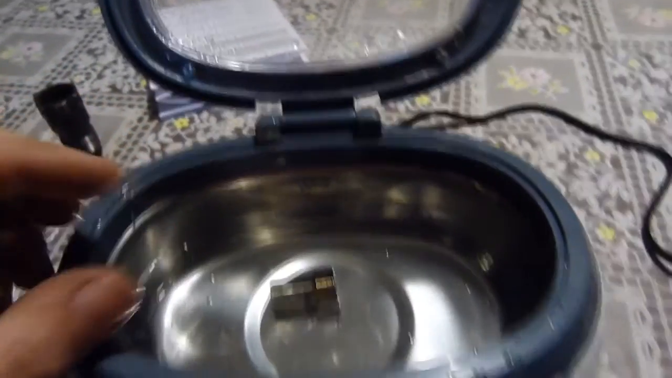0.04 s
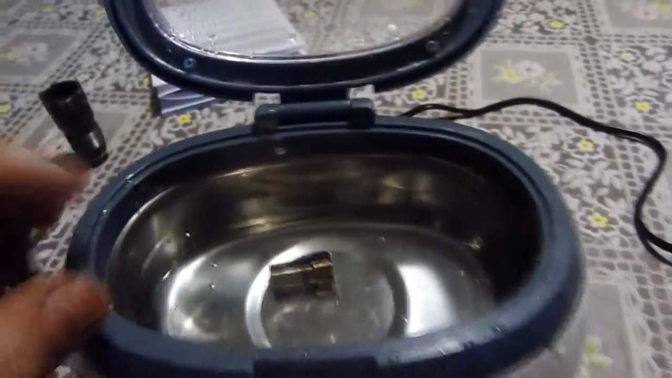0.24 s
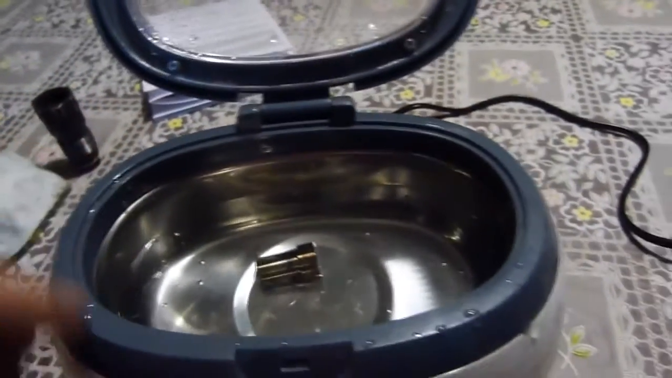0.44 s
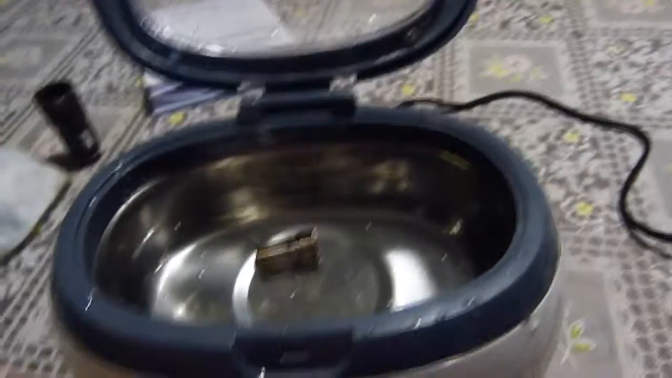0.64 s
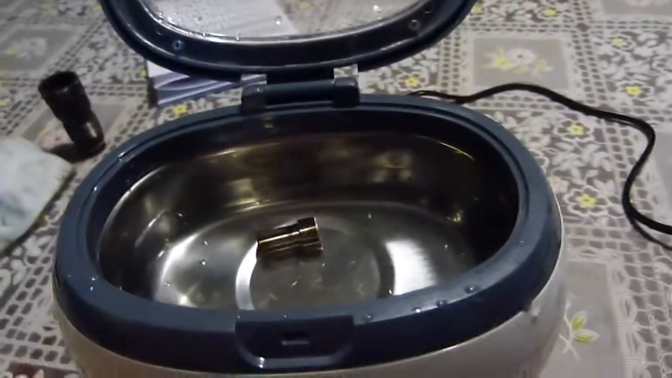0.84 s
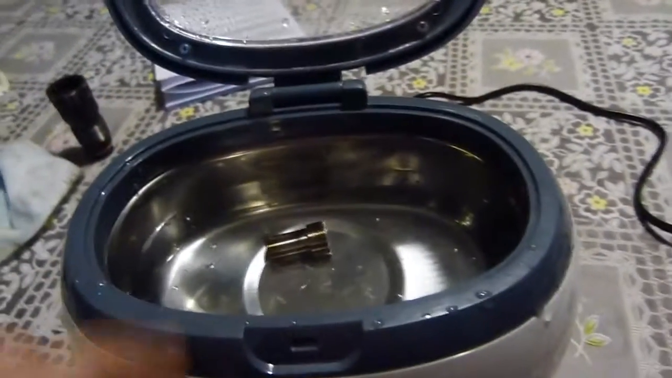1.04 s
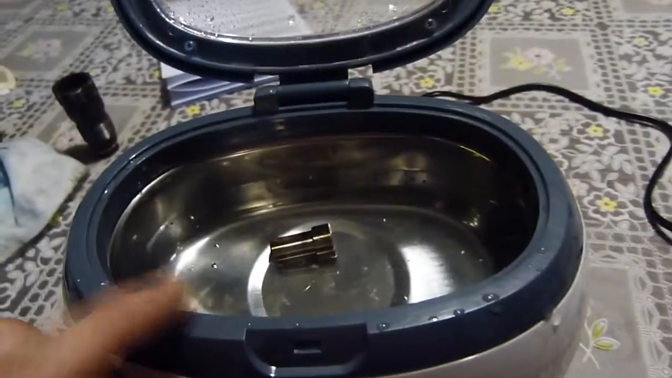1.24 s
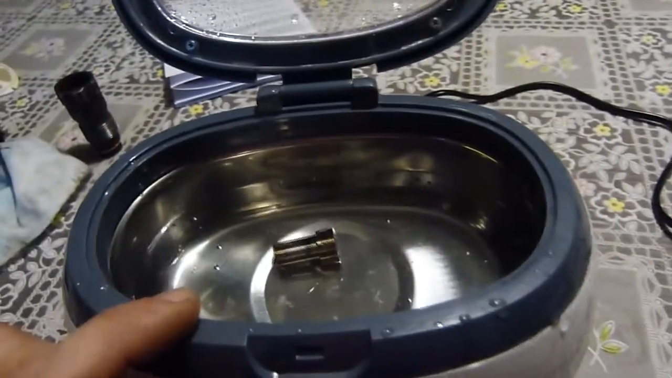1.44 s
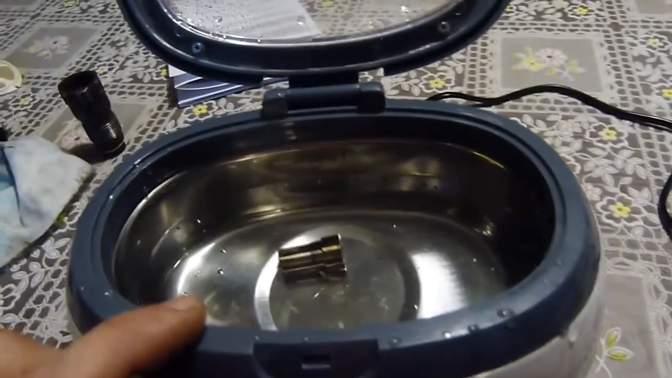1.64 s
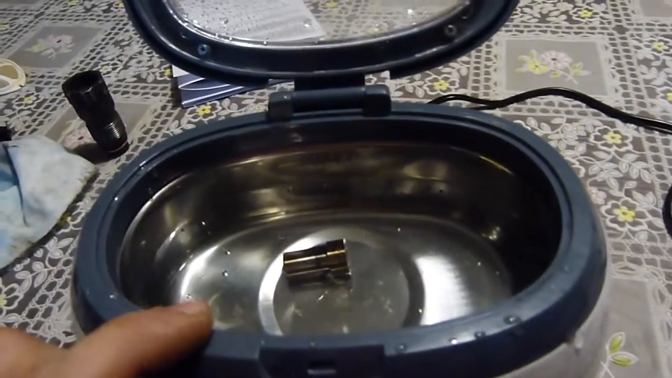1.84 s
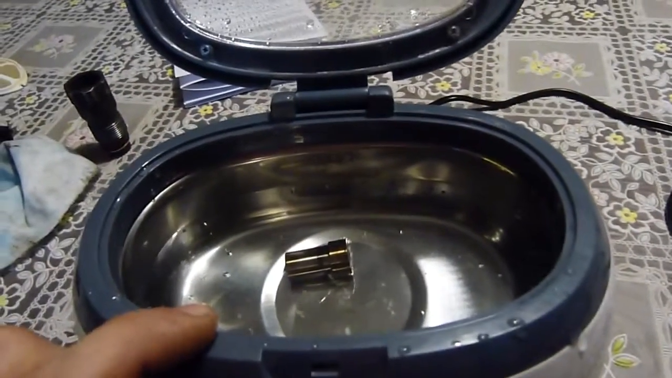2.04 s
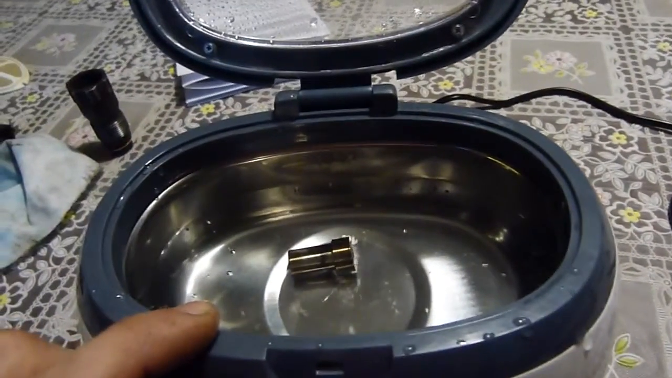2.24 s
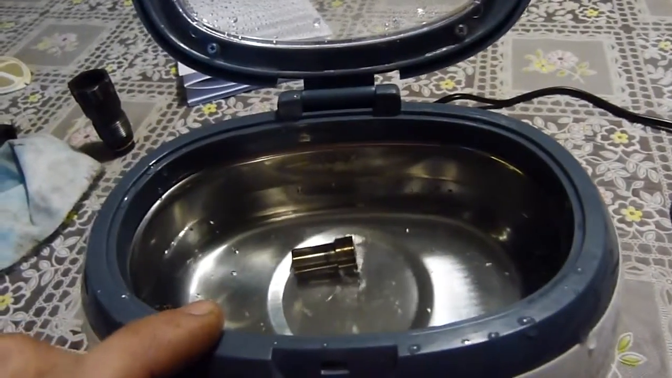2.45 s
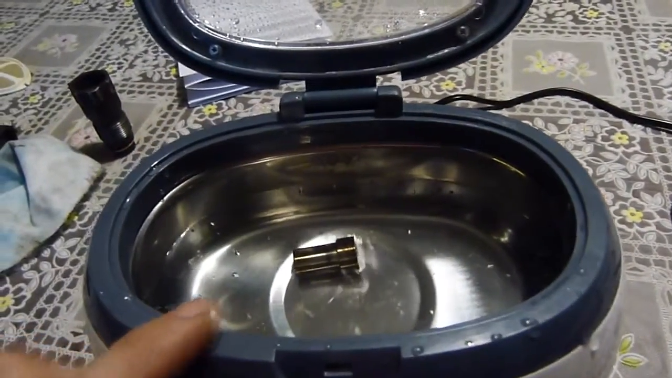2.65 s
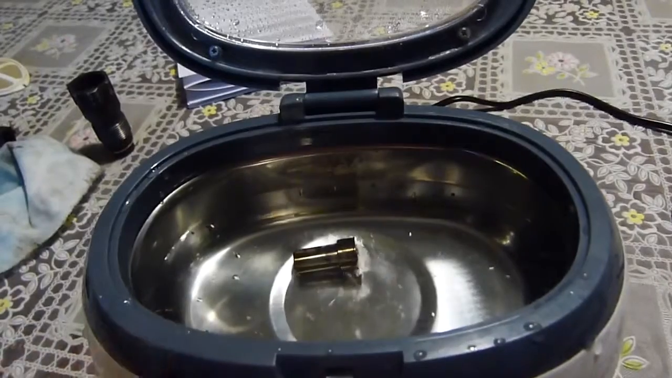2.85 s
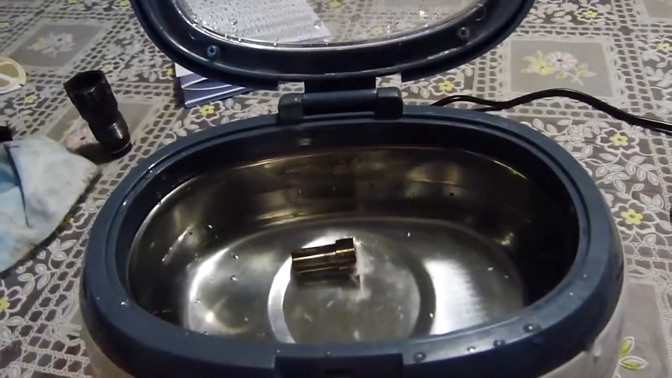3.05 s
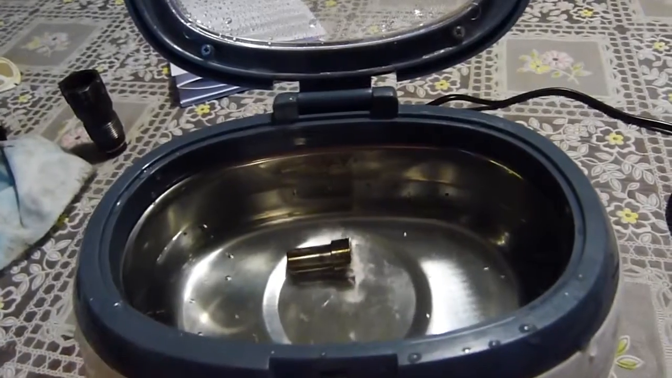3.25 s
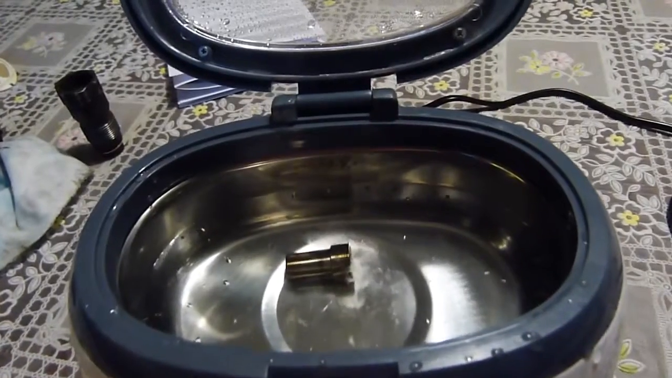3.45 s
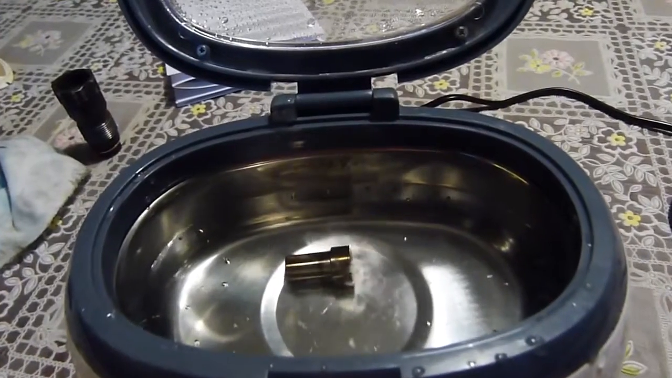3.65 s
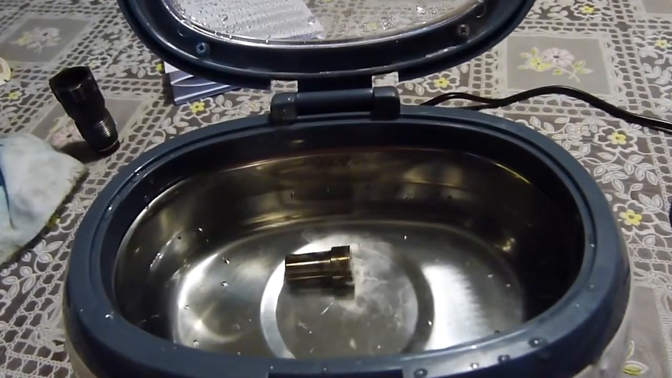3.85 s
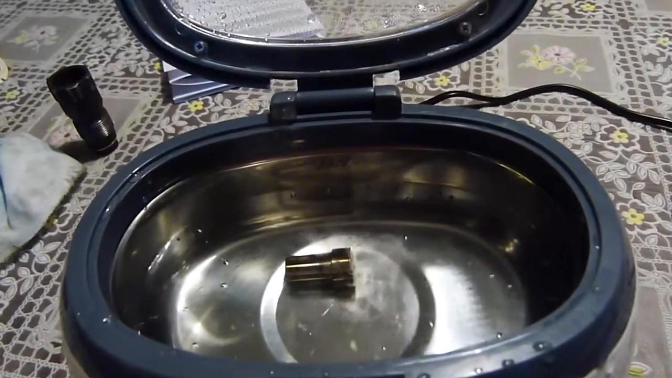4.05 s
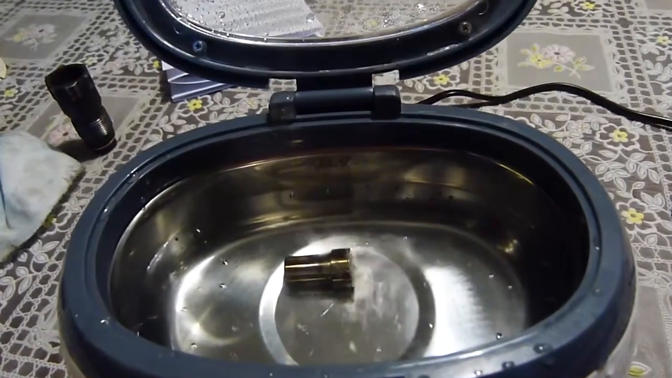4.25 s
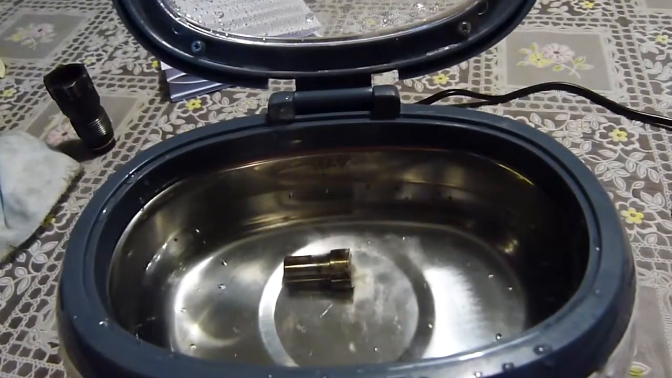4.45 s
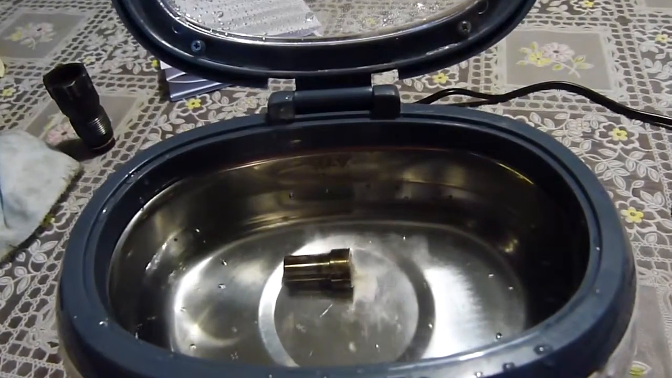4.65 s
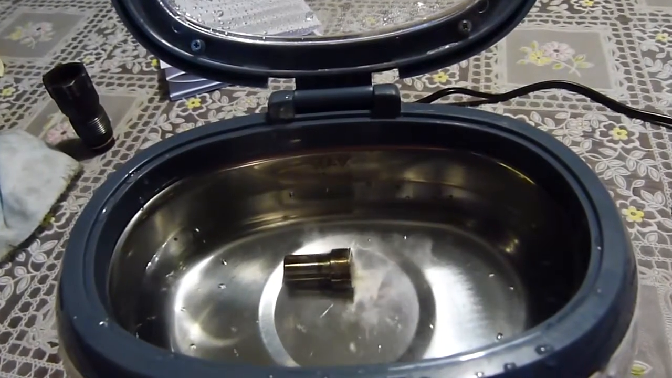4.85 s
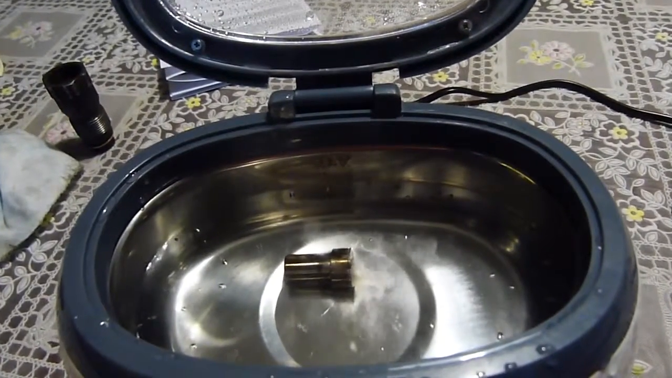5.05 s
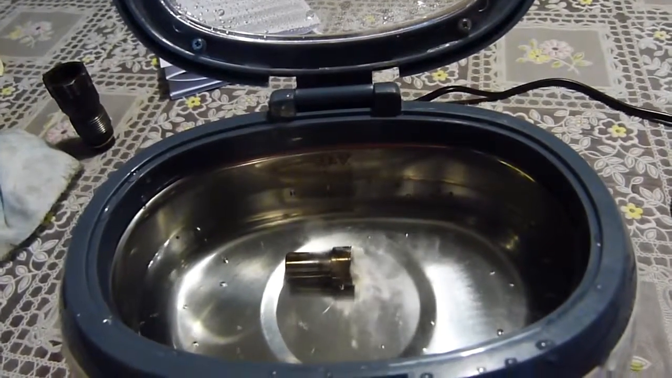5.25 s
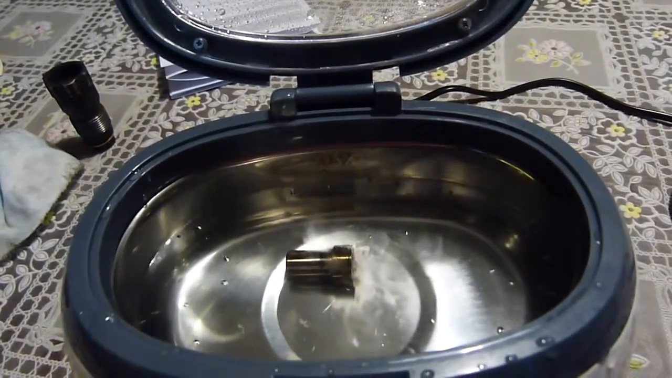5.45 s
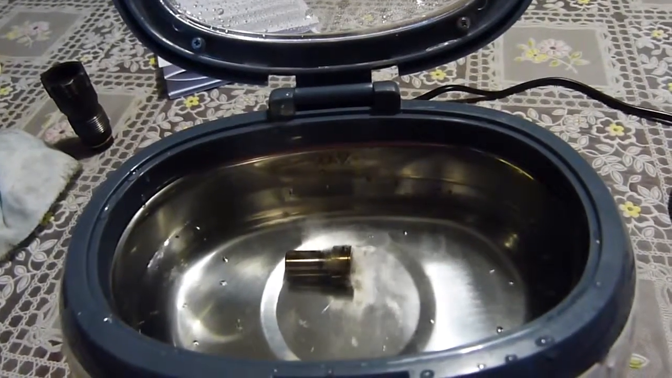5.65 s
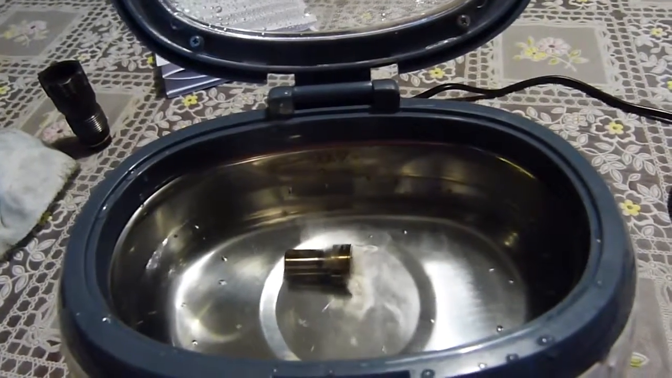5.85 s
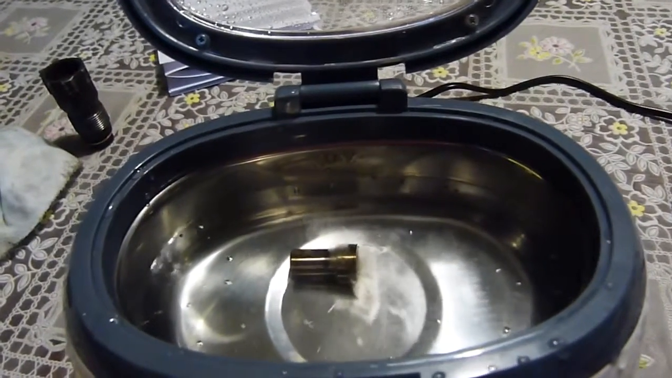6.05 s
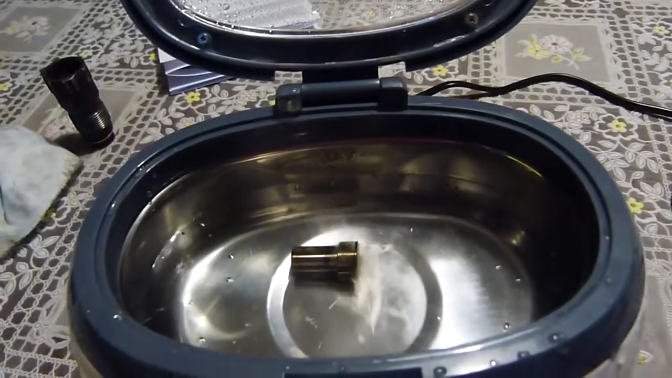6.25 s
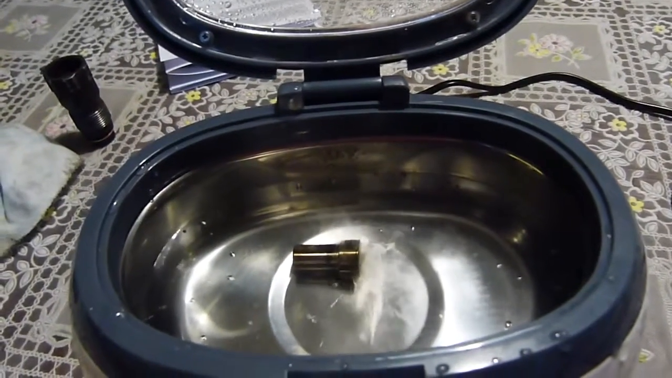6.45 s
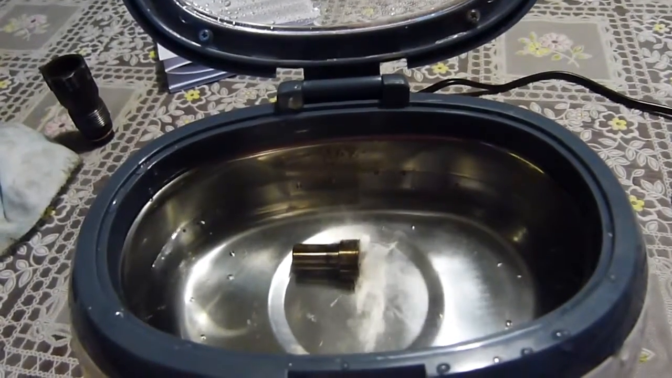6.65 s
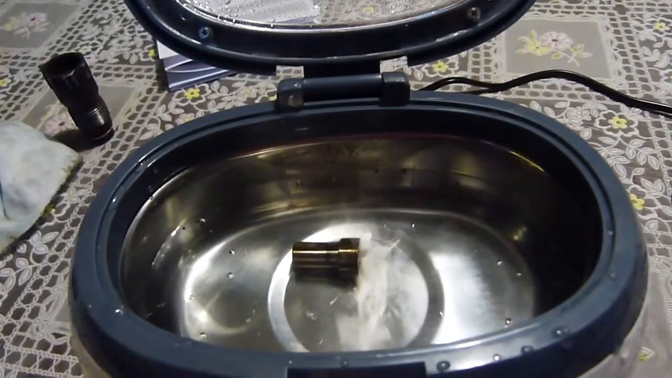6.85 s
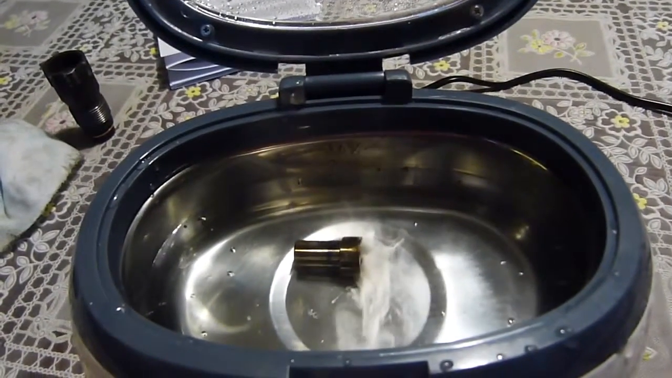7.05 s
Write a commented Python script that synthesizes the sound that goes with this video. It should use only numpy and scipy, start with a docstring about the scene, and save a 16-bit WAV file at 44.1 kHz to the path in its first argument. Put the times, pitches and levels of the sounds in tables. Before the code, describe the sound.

Faint air and muffled handling bumps open the scene, with dry plastic taps from about one second. A sharp snap of the button, then a duller click as it is released, and an ultrasonic cleaner with a metal part in water starts instantly. Its bright, raspy buzzing hiss runs on, wavering slightly and easing a little. Heard close, nearly centred, in a small quiet room.

```python
"""A small ultrasonic bath hisses in bursts fifty times a second: its transducer is fed once per mains cycle,
and each burst of noise also strikes the ringing modes of the steel tank and buzzes the body. A finger taps the
plastic housing, presses the button to start the bath and lets go just after: damped modes, scrapes and bright
ticks; the bath's first burst opens with a sharp crack. Underneath lie a low rumble that swells now and then and
the air of a quiet room, which sinks when the bath starts."""
import sys
import numpy as np
from scipy import signal
from scipy.fft import rfft, irfft
from scipy.io import wavfile
from scipy.ndimage import uniform_filter1d

SR = 44100
rng = np.random.default_rng(int(sys.argv[2]) if len(sys.argv) > 2 else 0)


def wav_record(signal):
    """Record a signal, one row per channel, as 16-bit PCM in the file named by sys.argv[1]."""
    frames = np.transpose(np.atleast_2d(signal))
    bounded = np.clip(frames, -1, 1)
    # unit amplitude maps onto the largest positive 16-bit level
    quanta = np.round(bounded * 32767).astype(np.int16)
    wavfile.write(sys.argv[1], SR, quanta)


N = 313800
T = np.arange(N) / SR
HZ = np.fft.rfftfreq(N, 1 / SR)
MAINS_HZ = 50.003
ON_S = 1.96  # start of the first burst
EDGE_HZ = 15810  # top of the band

# Colour of the rumble. Each row: frequency in Hz, relative level in dB per Hz.
RUMBLE_COLOUR = [(53, -51), (90, -10.5), (130, -1), (162, -11), (188, -2.5), (273, -2.5), (373, -19),
                 (600, -19.5), (780, -42), (1320, -120)]
# Booms ringing in the rumble. Each row: frequency in Hz, width in Hz, lift in dB.
RUMBLE_BOOMS = [(93, 21, 4), (137.2, 6.4, 15), (188.3, 12.6, 8.5), (287.3, 8.9, 10.5), (320, 36, 3.5)]
# Colour of the deepest rumble. Each row: frequency in Hz, relative level in dB per Hz.
DEEP_COLOUR = [(10, -26), (25, -16), (55, 5), (80, 10.5), (120, -29)]
# Swells of the rumble. Each row: centre in seconds, half length in seconds, boom level in dB,
# deep level in dB.
RUMBLE_SWELLS = [(.5, 0.086, -50.5, -66), (0.665, 0.072, -51, -61), (.82, 0.098, -54.5, -66),
                 (1.048, 0.083, -47, -61), (1.2, 0.15, -56, -78), (1.45, 0.066, -57.5, -84),
                 (1.69, 0.027, -53.5, -78), (1.897, 0.058, -57, -81), (2.45, 0.11, -71, -86),
                 (3.42, .08, -80, -86), (4.393, 0.072, -65.5, -82), (6.97, 0.11, -79, -86)]
HOLD_DB, HOLD_DEEP_DB = -5, -23.5  # resting boom and deep rumble, relative to the air
# Colour of the room air. Each row: frequency in Hz, relative level in dB per Hz.
AIR_COLOUR = [(180, -15.5), (300, -7.5), (462, -12.5), (787, -17.5), (961, -18), (1780, -24.5), (1930, -23),
              (2030, -26.5), (3460, -27.5), (3760, -33), (4090, -28), (8790, -31), (16000, -39)]
# Resonances in the air. Each row: frequency in Hz, width in Hz, lift in dB.
AIR_PEAKS = [(801, 18, 11.5), (3860, 130, 12), (8680, 390, 5.5)]
# Fader of the air, sinking as the bath starts. Each row: time in seconds, level in dB.
AIR_LEVEL = [(0, -60), (.8, -59.5), (1.5, -57.5), (1.95, -59.5), (2.02, -65.5), (2.5, -70.5), (4.5, -73),
             (5, -75.5), (7.12, -76.5)]
# Stereo spread of air and rumble. Each row: frequency in Hz, side minus mid in dB.
FAR_SIDE = [(60, -19), (130, -32), (290, -17), (640, -5), (1410, 2), (3100, 2.5), (6820, 0.5), (15000, 1)]
# Decay of the room's echo. Each row: frequency in Hz, t60 in seconds.
ROOM_DECAY = [(300, 0.15), (2000, 0.34), (8000, 0.39), (16000, 0.04)]

# Short bright ticks; the loud one at 1.96 s is the crack of the bath's first burst. Each row: start in seconds,
# level in dB, centre in Hz, t60 in seconds.
TICKS = [(0.8485, -30, 7850, 0.0084), (0.9611, -38, 11000, 0.012), (.973, -42, 9000, 0.0069),
         (1.334, -38, 8400, 0.024), (1.956, -21, 9000, 0.023), (1.96, -16, 10900, 0.015),
         (2.179, -33, 3000, .012)]
# Blows on the housing. Each row: start in seconds, level in dB, centre in Hz, spread in octaves,
# scrape t60 in seconds, scrape level in dB, left minus right in dB.
TAPS = [(0.992, -51.5, 1380, 0.29, 0.055, 5, 10), (1.067, -45.5, 2140, 0.88, 0.046, 7, -4),
        (1.127, -50, 1800, 0.32, 0.056, 0, 0), (1.262, -53, 1140, 0.26, 0.046, 6, 4),
        (1.3326, -28, 2360, 1.1, 0.069, -5, -1), (1.35, -46.5, 3000, 1.7, 0.4, 14, 0),
        (1.4106, -39, 1890, 1, 0.017, 6, 7), (1.457, -47.5, 2980, 0.55, 0.11, 4, -4),
        (1.6, -50, 2200, 0.55, .02, -2, 0), (1.612, -43, 2110, 0.74, 0.2, -1, -2),
        (1.679, -46, 1940, 0.58, 0.073, 3, -3), (1.9539, -17, 1800, 2.9, 0.017, 10, 0),
        (2.1769, -30.5, 710, 1.6, 0.1, -10, -1), (2.2, -40, 704, 0.42, 0.1, 11, 0)]
# Modes of the plastic housing. Each row: frequency in Hz, relative level in dB, t60 in seconds.
HOUSING_MODES = [(337, -5, .03), (470, -3.5, 0.044), (686, -10, 0.031), (784, 0.5, 0.041),
                 (1100, -10, 0.021), (1300, -13, .025), (1730, -5.5, 0.039), (2214, 1, 0.024),
                 (2810, -7, 0.023), (3950, -9, .025), (6500, -13, .015)]

# Slowly fading, slightly wavering buzz of the body. Each row: multiple of the mains, relative level in dB.
HUM_LINES = [(2, -25), (3, -24), (4, -25), (5, -18), (6, -12), (7, -14), (8, -15), (9, -18), (10, -17),
             (11, -18), (12, -18), (13, -25), (14, -25), (15, -19), (16, -13), (17, -22), (18, -19),
             (19, -11), (20, -13), (21, -16), (22, -10), (23, -13), (24, -15), (25, -15), (26, -9),
             (27, -13), (28, -14), (29, -9), (30, -24), (31, -16), (32, -18), (33, -11), (34, -10),
             (35, -25)]
HUM_DB, HUM_FADE_DB_PER_S = -57.5, 1.34  # level at switch-on and slow fall
# One hum line swells for a moment: multiple of the mains, centre in seconds, half length in seconds,
# lift in dB.
HUM_SWELL = (13, 3.06, 0.51, 18)
# Tank modes struck at set moments within each burst. Each row: frequency in Hz, relative level in dB,
# t60 in seconds, strike time in ms into the mains cycle.
TANK_MODES = [(2068, 13, .035, .3), (2290, 9, .016, .52), (2530, -3, .03, .3), (2800, 4, .015, 2.1),
              (2985, 1, .03, 2.1), (3170, 11, .02, 4.9), (3350, -4, .04, 4.9), (3500, -9, .04, 2.1),
              (3770, -7, .03, .7), (4000, 5, .035, .7), (4150, 5, .03, 1.5), (4400, -2, .02, .7)]
LOW_RING_DB, LOW_FADE_DB_PER_S = -23.5, 0.53  # low ring follows the hiss and slowly sinks under it
# Strength of the bath. Each row: time in seconds, hiss level in dB, high tank ring level in dB.
DRIVE = [(1.99, -34, -60), (2.25, -33.5, -59), (2.4, -33.5, -58.5), (2.72, -34.5, -67), (2.86, -32, -51),
         (3.0, -32.5, -58), (3.5, -33.5, -55.5), (3.85, -31.5, -59), (4.0, -32.5, -54), (4.2, -33, -58.5),
         (4.65, -34, -56.5), (4.85, -35.5, -56.5), (5.2, -39, -58.5), (5.45, -34.5, -52.5),
         (5.75, -36.5, -64), (6.25, -38.5, -55.5), (6.7, -38.5, -55.5), (7.11, -37, -61.5)]
# Power fed to the bubbles within one mains cycle. Each row: time in ms, level in dB.
BURST_SHAPE = [(0, -24), (.5, -7), (1, -2.5), (2, -.5), (3, 0), (5.6, -1.5), (6.8, -4.5), (7.8, -10),
               (9.5, -15), (13, -21), (20, -28)]
# Colour of the bubbles. Each row: frequency in Hz, relative level in dB per Hz.
FIZZ_COLOUR = [(250, -44), (500, -38.5), (850, -37), (1200, -30), (1800, -25), (2600, -18.5), (3500, -18),
               (4600, -11.5), (5300, -10.5), (7000, -7), (8500, -2.5), (10500, -3), (13900, -1.5),
               (15000, 2.5), (15700, 0.5)]
# Resonances of tank and water in the hiss. Each row: frequency in Hz, width in Hz, lift in dB.
WATER_PEAKS = [(1682, 29, 9.5), (2200, 410, 2), (3020, 440, 3), (5894, 500, 6.5), (6450, 130, 7.5),
               (11220, 590, 5), (12600, 1700, 5.5)]
# Colour of the lingering hiss. Each row: frequency in Hz, level in dB relative to the burst.
LINGER_COLOUR = [(1000, 11.5), (3000, 4), (6000, -3.5), (11000, -4), (16000, -10)]
# Band of the hiss that sings with the high ring: centre in Hz, half the reach of each skirt in Hz.
SING_BAND = (4050, 330)
SING_DB = -2.3  # singing, relative to the high ring level
# Stereo spread of the bubble hiss. Each row: frequency in Hz, side minus mid in dB.
NEAR_SIDE = [(60, 3), (130, 5), (290, 1.5), (640, 0), (1410, -8), (3100, -2.5), (6820, -7), (10000, -2),
             (15000, -2)]


def gain_of(db):
    """Decibels to gain."""
    return 10 ** (np.asarray(db) / 20)


def evened(x):
    """Scales to rms 1."""
    return x / np.sqrt(np.mean(x ** 2) + 1e-20)


def read(points, hz):
    """Reads a spectrum table on a log frequency axis."""
    f, value = np.transpose(points)
    return np.interp(np.log(hz + 1), np.log(f + 1), value)


def curve(rows, index=1):
    """One column of a timed table, drawn as a line through every sample."""
    columns = np.transpose(rows)
    return np.interp(T, columns[0], columns[index])


def colour(x, points, peaks=()):
    """Equalises by a spectrum with resonant bumps."""
    db = read(points, HZ)
    for f, width, lift_db in peaks:
        db = db + lift_db / (1 + (2 * (HZ - f) / width) ** 2)
    return irfft(rfft(x) * gain_of(db), N)


def ports(pair, side):
    """Spreads two alike signals in stereo: one is the mid, the other the coloured side."""
    mid, off = pair[0], colour(pair[1], side)
    return np.array([mid + off, mid - off])


def add(mix, s, sound):
    """Mixes a sound in at time s."""
    part = mix[..., round(s * SR):][..., :sound.shape[-1]]
    part += sound[..., :part.shape[-1]]


def wander(per_s):
    """Slow random drift of rms 1 that turns about per_s times a second."""
    steps = rng.standard_normal(int(T[-1] * per_s) + 2)
    return evened(np.interp(T * per_s, np.arange(len(steps)), steps))


def grip(rest_db, index):
    """Gain of the rumble: a wavering resting level plus the power of bell-shaped swells."""
    power = gain_of(2 * (curve(AIR_LEVEL) + rest_db + 2.8 * wander(8)))
    for row in RUMBLE_SWELLS:
        bell = np.exp(-((T - row[0]) / row[1]) ** 2)
        power = power + gain_of(2 * row[index]) * bell
    return np.sqrt(power)


def background():
    """Lumpy low rumble ringing in a few booms, over the noise of the room air."""
    lumps = gain_of(1.2 * evened(uniform_filter1d(rng.standard_normal(N), size=1500)))
    shake = lumps * rng.standard_normal((2, N))
    rumble = grip(HOLD_DB, index=2) * evened(colour(shake, RUMBLE_COLOUR, RUMBLE_BOOMS))
    deep = grip(HOLD_DEEP_DB, index=3) * evened(colour(shake, DEEP_COLOUR))
    air_noise = colour(rng.standard_normal((2, N)), AIR_COLOUR, AIR_PEAKS)
    air = gain_of(curve(AIR_LEVEL)) * evened(air_noise)
    return ports(rumble + deep + air, FAR_SIDE)


def room(x):
    """Echo from noise tails, one a channel, each band dying at its own speed."""
    hz, t, z = signal.stft(rng.standard_normal((2, SR // 2)), SR, nperseg=256)
    decay = gain_of(-60 * t / read(ROOM_DECAY, hz)[:, None])
    tail = signal.istft(z * decay, SR, nperseg=256)[1]
    tail[:, :130] = 0  # first reflection after 3 ms
    return signal.fftconvolve(x[None], tail / np.linalg.norm(tail[0]), axes=1)[:, :N]


def ticks():
    """Each tick is a fast-dying snap of noise around a high centre."""
    out, t = np.zeros(N), T[:2000]
    for s, db, hz, t60 in TICKS:
        band = signal.butter(2, [hz * 0.28, min(hz * 1.23, 20000)], "band", fs=SR)
        snap = signal.lfilter(*band, rng.standard_normal(len(t)))
        add(out, s, gain_of(db - 60 * t / t60) * snap)
    return out


def housing():
    """A fingertip or the button strikes the plastic modes near its centre and scrapes out noise."""
    out, t = np.zeros((2, N)), T[:8192]
    hz = np.fft.rfftfreq(8192, 1 / SR) + 1
    for s, db, centre_hz, spread, scrape_t60, scrape_db, pan_db in TAPS:
        ring = np.zeros(len(t))
        for f, mode_db, t60 in HOUSING_MODES:
            struck_db = mode_db - 7.9 * (np.log2(f / centre_hz) / spread) ** 2
            ring += gain_of(struck_db - 60 * t / t60) * np.sin(2 * np.pi * (f * t + rng.random()))
        band = gain_of(-6.5 * (np.log2(hz / centre_hz) / spread) ** 2)
        noise = evened(irfft(rfft(rng.standard_normal((2, len(t)))) * band))
        scrape = noise[0] + 0.45 * noise[1] * [[1], [-1]]  # mid and a little side
        scrape = scrape * gain_of(scrape_db - 9.0 - 60 * t / scrape_t60)
        attack = 1 - np.exp(-t / 0.00055)
        blow = (ring / abs(ring).max() + scrape) * attack
        sides_db = db + np.array([[.5], [-.5]]) * pan_db
        add(out, s, gain_of(sides_db) * blow / abs(blow).max())
    # thin plastic has no bass
    return signal.sosfilt(signal.butter(2, 280, "high", fs=SR, output="sos"), out)


def hum(scatter=1.0, waver_db=1.16, drift_db=1.07):
    """Multiples of the mains: upper ones gather near the burst's start, low ones are scattered."""
    out = np.zeros(N)
    swell_k, swell_s, swell_half_s, swell_db = HUM_SWELL
    for k, db in HUM_LINES:
        phase = rng.uniform(-1, 1) * (scatter if k > 17 else np.pi)  # radians
        if k == swell_k:
            db = db + swell_db * np.exp(-((T - swell_s) / swell_half_s) ** 2)
        level = gain_of(db + waver_db * wander(4) + drift_db * wander(0.98))
        out += level * np.cos(2 * np.pi * k * MAINS_HZ * (T - ON_S - .0007) + phase)
    return gain_of(HUM_DB - HUM_FADE_DB_PER_S * (T - ON_S)) * out * (T >= ON_S)


def tank(vary=0.11, jitter_ms=0.0055, low_waver_db=1.6, high_waver_db=1.0):
    """Every cycle strikes each tank mode at nearly the same moment, which gives the buzz its lines."""
    starts, t = ON_S + np.arange(300) / MAINS_HZ, T[:4000]
    rings = np.zeros((2, N))  # low, high
    for hz, db, t60, ms in TANK_MODES:
        size, late = rng.standard_normal((2, 300))
        at = np.round((starts + (ms + jitter_ms * late) / 1000) * SR).astype(int)
        blows = np.bincount(at, 1 + vary * size, 2 * N)[:N]
        mode = gain_of(db - 60 * t / t60) * np.sin(2 * np.pi * hz * t)
        rings[int(hz > 3600)] += signal.oaconvolve(blows, mode)[:N]
    # the rings keep nothing below about 1.3 kHz
    low, high = signal.sosfilt(signal.butter(4, 1300, "high", fs=SR, output="sos"), rings)
    low_db = curve(DRIVE) + LOW_RING_DB - LOW_FADE_DB_PER_S * (T - ON_S) + low_waver_db * wander(8.6)
    high_db = curve(DRIVE, index=2) + high_waver_db * wander(12)
    return gain_of(low_db) * low + gain_of(high_db) * high


def smooth_patches(grid, bands, frames):
    """Blurs random values over frequency and time, to rms 1."""
    return evened(uniform_filter1d(uniform_filter1d(grid, size=bands, axis=0), size=frames, axis=1))


def bubbles(cycle_db=0.14, lump_db=0.7, linger_s=0.0091, patch_db=1.25, drift_db=.5):
    """Dense collapses gated by the mains burst; cycles, lumps and single pops differ in size."""
    turns = np.maximum(T - ON_S, 0) * MAINS_HZ
    ms, db = np.transpose(BURST_SHAPE)
    gate_db = np.interp(turns % 1 / MAINS_HZ * 1000, ms, db)
    gate_db += cycle_db * rng.standard_normal(400)[turns.astype(int)]
    gate_db += lump_db * evened(uniform_filter1d(rng.standard_normal(N), size=50))
    gate_db += 1.5 * np.minimum(rng.exponential(1, N), 4)  # single pops
    gate = gain_of(gate_db) * (T >= ON_S)

    # sound lingers in tank and room: the power of the gate dies away smoothly
    keep = np.exp(-1 / (linger_s * SR))
    after = np.sqrt(signal.lfilter([1 - keep], [1, -keep], gate ** 2))
    burst, wash = rng.standard_normal((2, 2, N))
    fizz = colour(gate * burst + colour(after * wash, LINGER_COLOUR), FIZZ_COLOUR, WATER_PEAKS)

    # clouds of bubbles differ in colour and wander
    hz, t, z = signal.stft(fizz, SR, nperseg=128)
    quick, slow = rng.standard_normal((2, len(hz), len(t)))
    quick = smooth_patches(quick, 4, 8)
    slow = smooth_patches(slow, 6, 250)
    fizz = signal.istft(z * gain_of(patch_db * quick + drift_db * slow), SR, nperseg=128)[1][:, :N]

    centre, step = SING_BAND
    sing = colour(fizz, [(centre - 2 * step, -30), (centre, 0), (centre + 2 * step, -30)])
    hiss_db = curve(DRIVE) + 0.79 * wander(14)
    sing_db = curve(DRIVE, index=2) + SING_DB + 1.8 * wander(12)
    hiss = gain_of(hiss_db) * fizz / fizz[0, 3 * SR:].std()
    singing = gain_of(sing_db) * sing / sing[0, 3 * SR:].std()
    return (hiss + singing) * (T >= ON_S)


def scene():
    """Room and rumble, the finger and the bright ticks with their echo, and the bath."""
    taps, snaps = housing(), ticks()
    echo = gain_of(-7.0) * room(taps.mean(0) + snaps)
    near = taps + snaps + echo
    body = (tank() + hum()) * gain_of([[-.3], [.3]])  # leans right
    bath = (ports(bubbles(), NEAR_SIDE) + body) * gain_of([[-.4], [.4]])
    return background() + near + bath


def record(dry):
    """Band limit: a steep low-pass at EDGE_HZ."""
    low_pass = signal.firwin(1023, EDGE_HZ, window=("kaiser", 9), fs=SR)
    return signal.oaconvolve(dry, low_pass[None], "same")


dry = scene()
out = record(dry)
wav_record(out)
```